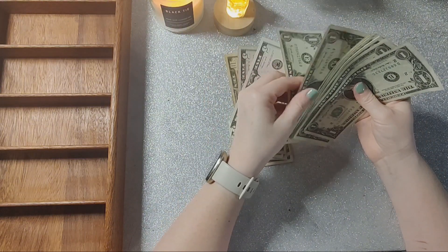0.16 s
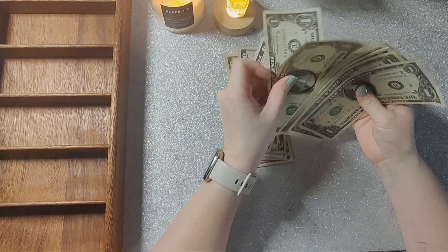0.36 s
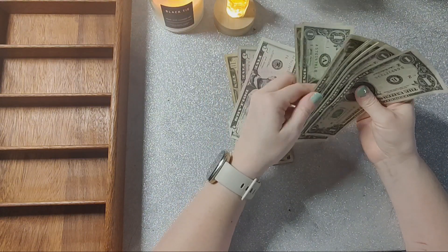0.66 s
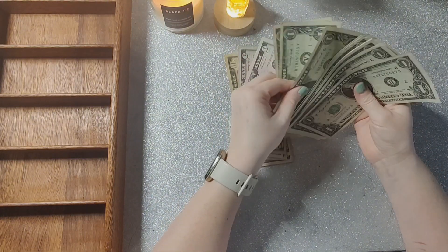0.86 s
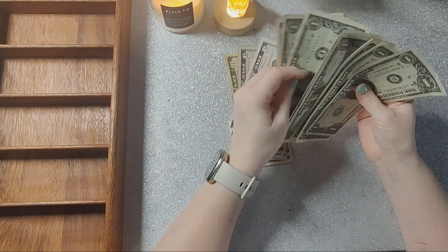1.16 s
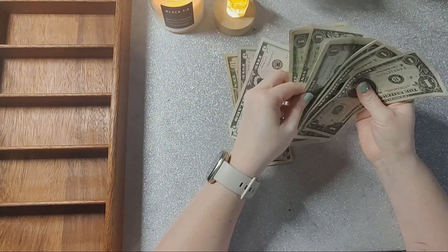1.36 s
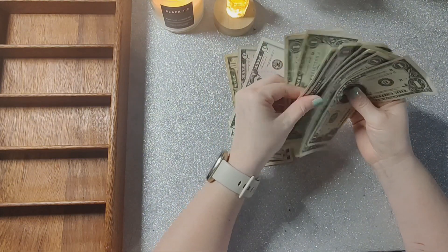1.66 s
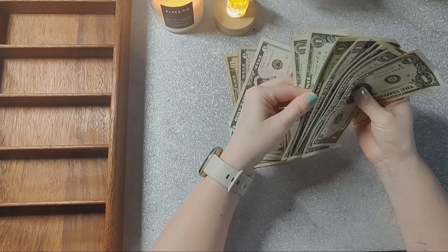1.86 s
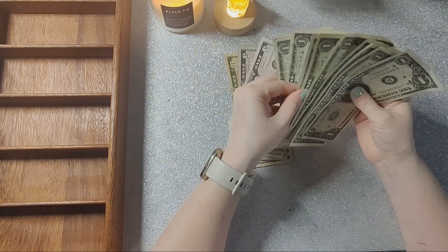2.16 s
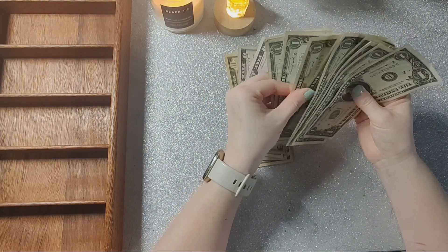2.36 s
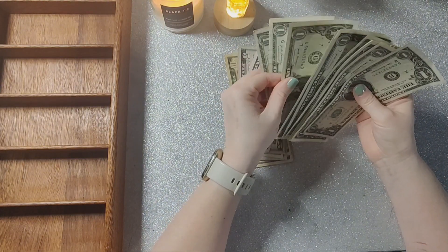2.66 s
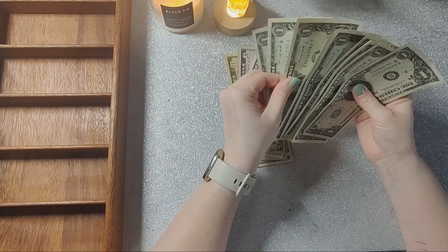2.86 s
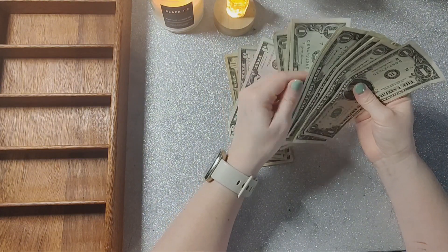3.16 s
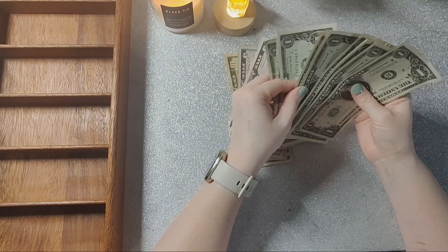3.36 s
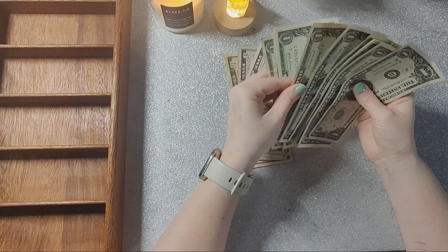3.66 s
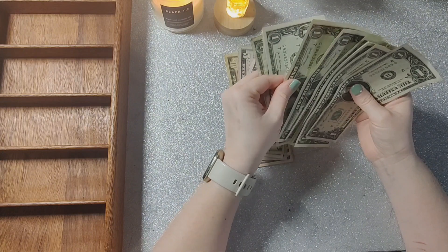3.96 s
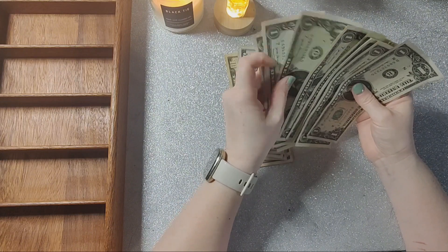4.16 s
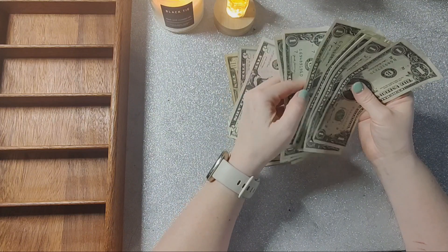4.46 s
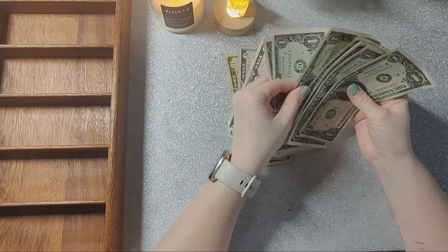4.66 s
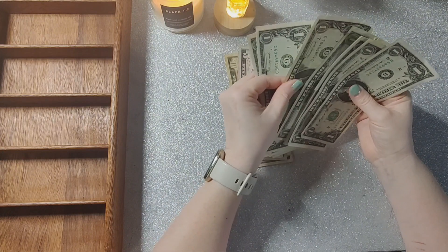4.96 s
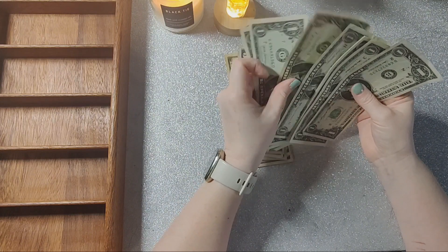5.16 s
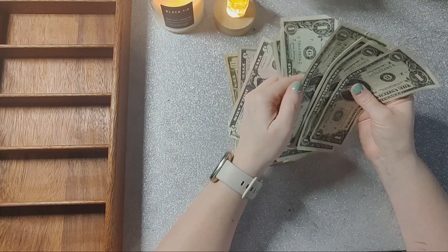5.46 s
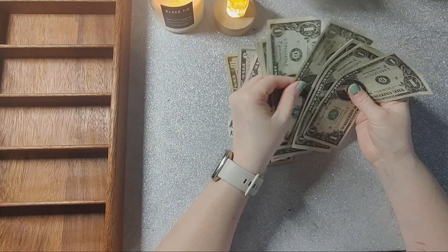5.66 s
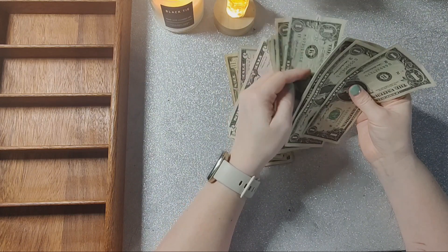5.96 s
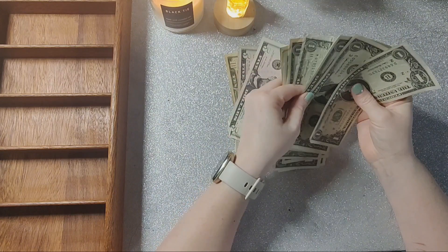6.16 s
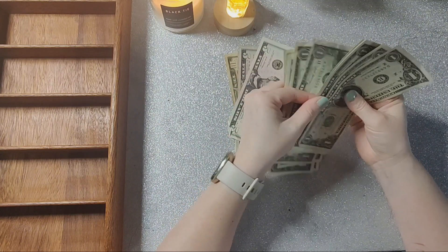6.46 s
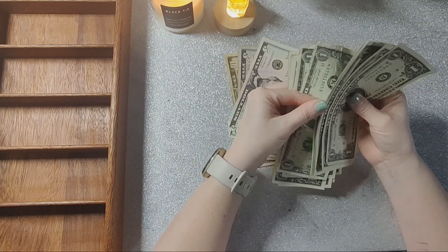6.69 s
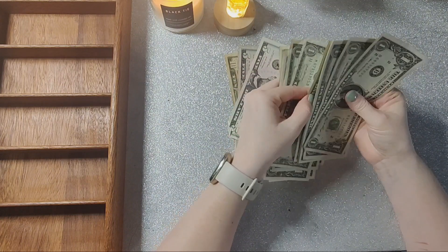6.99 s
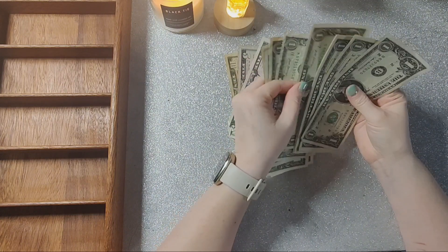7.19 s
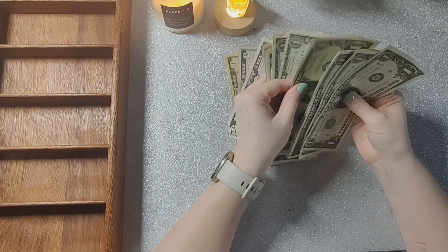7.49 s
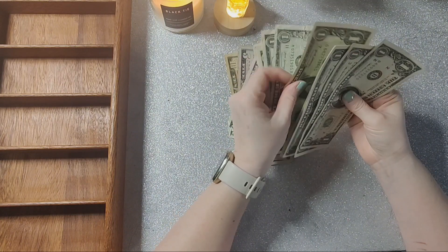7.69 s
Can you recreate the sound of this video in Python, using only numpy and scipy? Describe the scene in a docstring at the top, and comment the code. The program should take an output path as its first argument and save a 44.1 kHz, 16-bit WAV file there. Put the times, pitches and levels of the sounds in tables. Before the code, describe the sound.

Paper banknotes are counted by hand over a table, very close, in a quiet dry room with a faint low rumble. A loud papery flick with a dull finger tap starts at once; small ticks and rubbing follow around 0.4-0.5 s, with a tiny rising squeak near 0.6. Around 1.0-1.2 a cluster of low, soft flaps, then a quieter stretch with a bright tick at 1.8. Crisp snaps at 2.2 and 2.3, near quiet, then a sharp loud double snap at 3.1, more at 3.5 and 4.0. A dense crackling burst at 4.2, lighter flicks at 4.6-4.9, a strong crunchy cluster at 5.3, and the loudest hard snap at 5.9. After that, gentler slides and small snaps at 6.2-6.6, 7.0 and 7.2, a firm double flick at 7.63, and a soft fading rustle to the end.

```python
"""In a quiet room, paper banknotes are thumbed one by one from a fan onto a table, close to a microphone.
Stick-slip friction: each note slides over its neighbours in countless tiny slips, made as filtered impulses.
Impulsive release: an edge or a crease lets go as a damped swing of the sheet with a crack of fibres.
One note squeaks briefly on rising partials, edges graze in bright wisps and fingers tap the pile.
The moving hands stir a faint rumble beneath."""
import sys
import numpy as np
from scipy import signal
from scipy.fft import rfft, irfft
from scipy.io import wavfile
from scipy.ndimage import uniform_filter1d

SR = 44100
rng = np.random.default_rng(int(sys.argv[2]) if len(sys.argv) > 2 else 0)


def dump_mix(stems):
    """Bounce the given channels to the path in sys.argv[1] as a 16-bit WAV at rate SR."""
    frames = np.atleast_2d(stems).T  # one column per channel
    limited = np.clip(frames, -1, 1)  # hard clip at full scale
    pcm = np.round(limited * 32767).astype(np.int16)
    wavfile.write(sys.argv[1], SR, pcm)


N = 345303
TIME = np.arange(N) / SR
CUTOFF_HZ = 7100   # upper limit of the microphone input


def from_db(db):
    """Logarithmic level: decibels to amplitude gain."""
    return 10 ** (np.asarray(db) / 20)


def rms_one(x):
    """Normalisation: scale to unit power."""
    return x / np.sqrt(np.mean(x ** 2) + 1e-20)


def around(s):
    """Time window: the second of samples around a moment."""
    return slice(*np.searchsorted(TIME, [s - .5, s + .5]))


def band(x, low_hz, high_hz, order=2):
    """Causal band-pass filtering: nothing sounds before its cause."""
    sections = signal.butter(order, [low_hz, high_hz], "band", fs=SR, output="sos")
    return signal.sosfilt(sections, x)


def hump(x, hz, width):
    """Broad resonance of a damped sheet, from hz / width to hz * width."""
    return band(x, hz / width, hz * width)


def coloured(x, spectrum):
    """Minimum-phase filtering: the given spectrum is imposed so that nothing sounds early."""
    size = 2 ** 12
    hz, db = np.transpose(spectrum)
    log_hz = np.log(np.fft.rfftfreq(size, 1 / SR) + 1)
    log_gain = np.log(from_db(np.interp(log_hz, np.log(hz), db)))
    # folding the cepstrum onto positive times gives the minimum phase
    cepstrum = irfft(log_gain)[:size // 2]
    cepstrum[1:] *= 2
    impulse_response = irfft(np.exp(rfft(cepstrum, size)))
    return signal.fftconvolve(x, impulse_response)[:len(x)]


def drift(per_s):
    """Slow random modulation: chance values joined by straight lines, with unit power."""
    knots = rng.standard_normal(N)
    return rms_one(np.interp(TIME * per_s, np.arange(N), knots))


# Quiet room tone: (frequency [Hz], relative level [dB per Hz])
ROOM_TONE = [(30, -2), (300, -33.5), (7000, -37.5)]
HAND_MOVE_S, RUMBLE_FOLLOWS = .12, 0.31   # averaging time of the paper's level; share of its swing in dB


def background(paper, tone_db, rumble_db, lumpy_db):
    """Stationary noise plus modulated rumble: the hands' rumble eases when the paper is still."""
    tone = rms_one(coloured(rng.standard_normal(N), ROOM_TONE))
    power = uniform_filter1d(paper ** 2, int(HAND_MOVE_S * SR))
    activity = np.sqrt(np.abs(power) + 1e-12)
    lumps = from_db(lumpy_db * np.tanh(drift(18)))
    rumble = band(rng.standard_normal(N), 8.4, 70) * lumps * activity ** RUMBLE_FOLLOWS
    return from_db(tone_db) * tone + from_db(rumble_db) * rms_one(rumble)


def room(x, wet_db, t60):
    """Exponential reverberant decay: a short, faint tail from a furnished room."""
    t = TIME[:SR // 2]
    tail = band(rng.standard_normal(len(t)), 180, 4300) * from_db(-60 * t / t60) * (t > .006)
    return x + from_db(wet_db) * signal.fftconvolve(x, tail / np.linalg.norm(tail))[:N]


# Fingers padding against the pile: (time [s], level [dB], pitch [Hz])
TAPS = [(.006, -21.5, 216.5), (.522, -39, 189), (1.218, -38.5, 205), (2.944, -51, 445), (3.052, -34.5, 458),
        (4.292, -36.5, 188.2), (5.584, -51, 149.3), (6.677, -48, 175), (6.993, -47.5, 442),
        (7.722, -42, 228)]


def tapping(width, decay_s, rough):
    """Damped impact: fingers pad against the pile on the table in short, dull, low knocks."""
    out = np.zeros(N)
    for s, level_db, hz in TAPS:
        age = np.maximum(TIME[around(s)] - s, 0)
        tone = np.sqrt(2) * np.sin(2 * np.pi * hz * age)
        noise = rms_one(hump(rng.standard_normal(len(age)), hz, width))
        knock = (tone + rough * noise) / np.hypot(1, rough)
        envelope = age / decay_s * np.exp(1 - age / decay_s)
        out[around(s)] += from_db(level_db) * envelope * knock
    return out


# Partials of the squeak: (frequency at onset [Hz], relative level [dB])
SQUEAK = [(2020, -37), (2610, -32.5), (3480, -43)]
SQUEAK_START_S = .573


def squeak(rise_s, decay_s, waver, climb):
    """Periodic stick-slip: one note sings on rough, slightly rising partials that die away."""
    age = np.maximum(TIME - SQUEAK_START_S, 0)
    grip = drift(500)
    # an uneven grip shakes loudness and pitch together
    envelope = np.minimum(age / rise_s, 1) * np.exp(-age / decay_s) * from_db(2 * grip)
    # as the grip loosens the partials climb and break up, each in its own way
    loose = np.tanh(age / decay_s)
    partials = np.zeros(N)
    for hz, db in SQUEAK:
        glide = 1 + loose * (climb + waver * (grip + drift(500)))
        phase = 2 * np.pi * hz * np.cumsum(glide) / SR
        partials += from_db(db) * np.sin(phase)
    return 2 * envelope * partials


# Colour of rubbed paper: (frequency [Hz], relative level [dB per Hz])
PAPER = [(120, -6.5), (340, -13), (490, 3.5), (720, 3.5), (830, -6), (1400, -4.5), (2100, -6), (3300, -15),
         (3950, -9), (4800, -27), (6400, -24), (7200, -44)]


def paper_coloured(x):
    """Spectral shaping: friction between fibres takes on the colour of rubbed paper."""
    return coloured(x, PAPER)


def slips(per_s, spread_db, clump_db):
    """Random stick-slip: fibres let go in clumps; a few slips are much larger than the rest."""
    sizes = from_db(spread_db * np.minimum(rng.exponential(1, N), 4)) * rng.choice([-1, 1], N)
    happens = rng.random(N) < per_s / SR
    return sizes * happens * from_db(clump_db * drift(130))


def edge_hiss():
    """Dense friction noise: fine slips along the edge of a note, at unit power."""
    fine = paper_coloured(slips(per_s=4600, spread_db=0.0, clump_db=3.5))
    return rms_one(band(fine, 2400, CUTOFF_HZ))


RISE_SHARE = 0.37     # part of a stroke's length spent speeding up
SWELL_SHAPE = 1.445   # 1 = pointed, 2 = bell-shaped


def rise_and_fall(length_s):
    """Asymmetric motion: split a stroke into speeding up and slowing down."""
    return RISE_SHARE * length_s, (1 - RISE_SHARE) * length_s


def swell(t, rise_s, fall_s):
    """Stretched-exponential envelope: the speed of a stroke that is fastest at t = 0."""
    return np.exp(-np.abs(t / np.where(t < 0, rise_s, fall_s)) ** SWELL_SHAPE)


# The thin edge of a note grazes another: (time of fastest motion [s], length [s], level [dB])
GRAZES = [(0.939, 0.11, -52.5), (1.155, 0.015, -44), (1.296, 0.048, -48), (1.689, 0.042, -44),
          (1.823, 0.0053, -24.5), (3.102, 0.049, -43.5), (3.789, 0.048, -44), (4.245, 0.061, -40),
          (4.395, 0.045, -44), (4.602, 0.019, -34), (5.287, 0.1, -39.5), (5.406, 0.046, -37.5),
          (6.149, 0.023, -37), (6.424, 0.057, -46.5), (6.63, 0.026, -40), (6.934, 0.014, -41.5),
          (7.065, 0.044, -44.5), (7.82, 0.043, -39.5)]


def grazing(low_hz):
    """Edge friction: edges brush past each other in brief, bright wisps that swell and fade."""
    level = np.zeros(N)
    for s, length_s, db in GRAZES:
        level[around(s)] += from_db(db) * swell(TIME[around(s)] - s, *rise_and_fall(length_s))
    return level * rms_one(band(edge_hiss(), low_hz, SR / 3))


SHEET_TOP_HZ = 4400   # upper edge of a sheet's resonance
# upper edge of a snap's swing, as a multiple of its pitch
SWING_TOP = 2.67
# ringing: level at 500 Hz, decay in cycles, scatter of its modes in octaves
RING_DB, RING_CYCLES, RING_SPREAD = -11, 2.4, 0.28


def ringing(hz, t, count=4):
    """Modal decay: a few sheet modes, new for every fold; a slack sheet rings louder and longer."""
    modes_hz = hz * 2 ** (RING_SPREAD * rng.standard_normal((count, 1)))
    decay = np.exp(-t * hz / RING_CYCLES)
    modes = np.sin(2 * np.pi * modes_hz * t) * decay * rng.choice([-1, 1], (count, 1))
    return from_db(RING_DB) * 500 / hz * modes.sum(0) / np.sqrt(count)


# The weaker a crack, the lower its upper edge: (crack level [dB relative to snap], upper edge [Hz])
CRACK_TOP = [(-14.5, 3800), (-4.5, 8800)]
# a crack's rise and fall, its peak after the snap begins, its lower edge
CRACK_S, CRACK_LAG_S, CRACK_LOW_HZ = 0.0014, .0006, 2040


def crack(t, crack_db):
    """Burst of fracture noise: fibres give way in a rush around the fold, at unit energy."""
    rush = rng.standard_normal(len(t)) * np.exp(-np.abs(t - CRACK_LAG_S) / CRACK_S)
    top_hz = np.interp(crack_db, *np.transpose(CRACK_TOP))
    fibres = band(paper_coloured(rush), CRACK_LOW_HZ, top_hz, order=4)
    return fibres / np.linalg.norm(fibres)


# An edge or a crease lets go:
# (time [s], nominal swing peak [dB], pitch [Hz], crack level [dB relative to the snap's swing])
SNAPS = [(0.023, -4, 533, -22), (0.175, -23.5, 509, -37.5), (0.3636, -23.5, 1466, -37),
         (0.4516, -15, 800, -35.5), (.476, -14.5, 510, -42), (0.4882, -15, 549, -35),
         (0.8525, -20.5, 548, -12.5), (.956, -19.5, 1375, -24), (0.9646, -13.5, 900, -22.5),
         (0.9938, -17, 800, -36), (1.0566, -19.5, 737, -40), (1.081, -21, 564, -43),
         (1.0978, -11.5, 476, -53.5), (1.1216, -10, 457, -52), (1.157, -19, 1800, -11.5),
         (1.2493, -24.5, 436.6, -15), (1.63, -25, 503, -34), (1.8251, -22.5, 880, -2),
         (2.006, -13, 941, -28.5), (2.027, -29.5, 412.5, -52), (2.2084, -9.5, 1038, -11),
         (2.2225, -22, 698, -23), (2.2433, -16, 650, -12), (2.267, -23, 668, -11.5),
         (2.3239, -9, 749, -4.5), (2.5607, -19.5, 781, -2), (2.6845, -24, 636, -29.5),
         (3.0567, -26, 411.4, -26.5), (3.1063, -2.5, 1218, -9.5), (3.114, -6, 695, -8.5),
         (3.219, -20.5, 724, -36), (3.4602, -5, 1306, -23), (3.4746, -12.5, 770, -11),
         (3.5357, -8, 555, -15.5), (3.813, -22, 716, -29.5), (3.9977, -5.5, 960, -12.5),
         (4.1844, -5.5, 664, -35.5), (4.2038, -4.5, 721, -20), (4.226, -17, 617, -33),
         (4.2413, -6, 758, -31), (4.2475, -5, 805, -20), (4.262, -20, 2070, -12), (4.329, -25, 600, -28),
         (4.5464, -33, 714, -50.5), (4.6105, -14.5, 1390, -33), (4.692, -31, 905, -18),
         (4.7645, -17, 794, -36.5), (4.7796, -11, 1267, -11), (4.8965, -15, 850, -34),
         (4.9112, -20.5, 764, -34), (5.2607, -5.5, 1047, -1.5), (5.2705, -8.5, 775, -16.5),
         (5.2815, -11, 783, -5), (5.2942, -6.5, 1393, -43.5), (5.364, -22.5, 412, -6),
         (5.4445, -19, 589, -0.5), (5.702, -25.5, 900, -8), (5.8637, -6, 781, -14), (5.9063, 1, 1573, -8),
         (6.2359, -22, 864, -27), (6.3527, -12.5, 755, -29.5), (6.5701, -32.5, 435, -40),
         (6.629, -19, 1128, -5), (6.893, -28.5, 408, -52), (7.0405, -16, 1340, -5.5),
         (7.206, -10.5, 813, -5), (7.556, -23.5, 562, -20), (7.63, -7.5, 1157, -23.5),
         (7.6353, -7, 1036, -43)]


def snapping(width, flutter_db, flutter_s):
    """Impulse response: one swing of the sheet with a crack of fibres, a brief flutter and ring."""
    out, t = np.zeros(N + SR), TIME[:SR // 20]
    push = 1.0 * (t == 0)
    for s, peak_db, hz, crack_db in SNAPS:
        flutter_envelope = t / flutter_s * np.exp(1 - t / flutter_s)
        flutter = from_db(flutter_db) * rng.standard_normal(len(t)) * flutter_envelope
        swing = hump(push, hz, width)
        swing /= np.abs(swing).max()
        swing = signal.fftconvolve(swing, push + flutter)[:len(t)] + ringing(hz, t)
        # the lower its pitch, the rounder its swing
        swing = from_db(peak_db) * band(swing, 56, min(SWING_TOP * hz, SHEET_TOP_HZ), order=5)
        start = int(s * SR)
        out[start:start + len(t)] += swing
        crack_gain = from_db(crack_db) * np.linalg.norm(swing)
        out[around(s)] += crack_gain * crack(TIME[around(s)] - s, crack_db)
    return out[:N]


def crinkle(per_s, low_hz, high_hz, width, count=12):
    """Random buckling: small creases give way, spread over a ladder of pitches, at unit power."""
    ticks = np.zeros(N)
    for hz in np.geomspace(low_hz, high_hz, count):
        creases = slips(per_s / count, spread_db=1.3, clump_db=0.5)
        ticks += hump(creases, hz, width) / np.sqrt(hz)
    return rms_one(ticks)


# the table's reflection of each stroke; its lag follows the note's height
ECHO_DB, ECHO_NEAR_S, ECHO_FAR_S = -3.5, .0005, 0.0025
BEND_S = .04   # a sliding note changes shape in about this time


def off_table(x):
    """Comb filtering: the sound plus its table reflection, whose lag glides as the note lifts and bends."""
    t = TIME[:len(x)]
    lags_s = rng.uniform(ECHO_NEAR_S, ECHO_FAR_S, size=100)
    lag_s = np.interp(t / BEND_S, np.arange(len(lags_s)), lags_s)
    return x + from_db(ECHO_DB) * np.interp(t - lag_s, t, x, left=0)


def flapping_sheet(x, hz, width, flap_db, shared, own):
    """Time-varying resonance: adjoining bands flap partly together, partly apart, shifting the colour."""
    edges = np.geomspace(hz / width, min(hz * width, SHEET_TOP_HZ), len(own) + 1)
    sheet = np.zeros(len(x))
    for k, apart in enumerate(own):
        flap = from_db(flap_db * (shared + apart) / np.sqrt(2))
        sheet += (-1) ** k * band(x, edges[k], edges[k + 1]) * flap
    return sheet


FLICK_RISE_S = 0.0013   # a flick is at full speed almost at once
# after every snap the freed note settles: level relative to the swing, pitch ratio, rise and fall
SETTLE_DB, SETTLE_PITCH, SETTLE_S = -35, 0.65, 0.011
# A note is drawn over its neighbours:
# (time of fastest motion [s], length [s], level [dB], pitch [Hz])
SLIDES = [(0.006, 0.055, -26.5, 652), (0.025, 0.075, -37, 2117), (0.354, 0.099, -47.5, 2230),
          (0.436, 0.032, -33.5, 1266), (0.508, 0.042, -26.5, 641), (0.624, 0.096, -47, 2560),
          (0.922, 0.015, -35.5, 1105), (0.973, 0.19, -40.5, 707), (1.133, 0.055, -31.5, 495),
          (1.269, 0.091, -48, 1490), (1.667, 0.06, -30, 1129), (1.825, 0.011, -35, 2106),
          (1.863, 0.043, -41, 480), (2.163, 0.014, -18, 1515), (2.24, 0.067, -39, 1713),
          (2.308, 0.042, -31.5, 1443), (2.442, 0.062, -33, 1410), (2.623, 0.04, -49, 3170),
          (2.798, 0.12, -65, 1700), (3.119, 0.031, -18, 1250), (3.197, 0.08, -39, 706),
          (3.596, 0.05, -28.5, 937), (3.789, 0.046, -47.5, 955), (4.051, 0.017, -42.5, 1650),
          (4.245, 0.034, -20.5, 850), (4.604, 0.015, -22.5, 1246), (4.772, 0.072, -41.5, 1080),
          (4.9, 0.06, -47.5, 890), (5.274, .04, -23.5, 1256), (5.365, 0.1, -34, 1364),
          (5.556, 0.056, -55, 2056), (5.669, 0.12, -59, 215.7), (5.71, 0.021, -40.5, 713),
          (5.866, 0.18, -44, 2407), (5.908, 0.03, -25.5, 920), (5.948, 0.033, -28.5, 1113),
          (6.009, 0.028, -34.5, 1300), (6.146, 0.022, -28, 1250), (6.275, 0.054, -40.5, 420),
          (6.403, 0.067, -33, 1190), (6.626, 0.051, -36, 728), (6.938, 0.0074, -36.5, 407),
          (7.067, 0.055, -36.5, 1031), (7.326, 0.04, -34.5, 854), (7.445, 0.029, -35.5, 1200),
          (7.546, 0.044, -36.5, 536), (7.637, 0.017, -15, 950), (7.663, 0.057, -37, 828),
          (7.82, 0.069, -36.5, 876)]
# A note jerks free of the thumb and skids to rest: (time [s], fade [s], level [dB], pitch [Hz])
FLICKS = [(0.242, 0.05, -54.5, 3100), (0.758, 0.017, -42.5, 2303), (1.455, 0.047, -45, 379),
          (1.561, 0.02, -45, 1204), (1.904, 0.017, -33.5, 590), (2.374, 0.009, -35.5, 850),
          (2.764, 0.018, -53, 3200), (3.9, 0.021, -53, 2100), (4.385, 0.034, -39, 2360),
          (6.226, 0.027, -32.5, 1470), (7.176, 0.018, -44, 2676), (7.617, 0.012, -30, 593),
          (7.725, 0.031, -32.5, 480)]


def strokes():
    """Kinematics of friction: slides, flicks and settling as (s, rise s, fall s, level dB, pitch Hz)."""
    drawn = [(s, *rise_and_fall(length_s), db, hz) for s, length_s, db, hz in SLIDES]
    flicked = [(s, FLICK_RISE_S, fade_s, db, hz) for s, fade_s, db, hz in FLICKS]
    settling = [(s + SETTLE_S, SETTLE_S, SETTLE_S, db + SETTLE_DB, hz * SETTLE_PITCH)
                for s, db, hz, _ in SNAPS]
    return drawn + flicked + settling


DRAG_DB, DRAG_STRETCH = -17, 1.58   # the rest of the fan is dragged along, softer and for longer
CRINKLE_DB = -8.5                   # stray ticks relative to the slide, before the sheet filters them
HISS_DB, HISS_GROWTH = -23, 0.85    # edge hiss of a full-strength stroke; exponent of its growth
HISS_TAUTNESS = 0.38                # a taut, high-pitched sheet hisses more than a slack one
TAUT_NARROWING = 0.17               # a taut sheet resonates in a narrower band


def sliding(width, air_db, flap_db, body_db, body_hz, count=4):
    """Friction-driven resonance: coarse slips shake the sheet and the fan, fine ones hiss along its edge."""
    coarse = paper_coloured(slips(per_s=3900, spread_db=4.0, clump_db=2.0))
    air = rms_one(band(rng.standard_normal(N), 6.3, 160))
    body = rms_one(hump(slips(per_s=2800, spread_db=4.0, clump_db=5.0), body_hz, 1.56))
    ticks = crinkle(per_s=130, low_hz=480, high_hz=2870, width=1.294)
    hiss, flapping = edge_hiss(), drift(70)
    buckling = np.array([drift(55) for _ in range(count)])
    out, edge_power = np.zeros((2, N))
    for s, rise_s, fall_s, db, hz in strokes():
        near = around(s)
        t = TIME[near] - s
        drag = from_db(DRAG_DB) * swell(t / DRAG_STRETCH, rise_s, fall_s)
        speed = from_db(db) * (swell(t, rise_s, fall_s) + drag)
        # the lower its pitch, the slacker the sheet
        slack = 500 / hz
        reach = width * slack ** TAUT_NARROWING
        sheet = flapping_sheet(coarse[near], hz, reach, flap_db, flapping[near], buckling[:, near])
        sheet = rms_one(off_table(sheet))
        # stray ticks take on the colour of the sheet
        sheet += from_db(CRINKLE_DB) * hump(ticks[near], hz, reach)
        # a slack sheet also fans more air at the microphone and shakes the whole fan more
        shaken = from_db(air_db) * air[near] + from_db(body_db) * body[near]
        out[near] += speed * (sheet + slack * shaken)
        edge_power[near] += (speed / slack ** HISS_TAUTNESS) ** 2
    return out + from_db(HISS_DB) * np.sqrt(edge_power) ** HISS_GROWTH * hiss


def scene():
    """Superposition: slides, flicks, snaps, grazes, finger taps and the squeak over the room's floor."""
    snaps = snapping(width=1.81, flutter_db=-24.5, flutter_s=0.0014)
    taps = tapping(width=1.6, decay_s=0.0068, rough=0.77)
    singing = squeak(rise_s=0.011, decay_s=.026, waver=0.042, climb=0.04)
    sharp = room(snaps + taps + singing, wet_db=-19, t60=0.12)
    slides = sliding(width=3.4, air_db=-16.0, flap_db=4.0, body_db=-8.5, body_hz=258)
    paper = slides + grazing(low_hz=3550) + sharp
    return (paper + background(paper, tone_db=-70.5, rumble_db=-57, lumpy_db=13.5))[None]


def record(dry):
    """Clipping and band limiting: the loudest snaps overload the input; the top is cut steeply."""
    steep_cut = signal.ellip(10, .3, 70, CUTOFF_HZ, fs=SR, output="sos")
    return signal.sosfilt(steep_cut, np.clip(dry, -.76, .76))


dry = scene()
out = record(dry)
dump_mix(out)
```